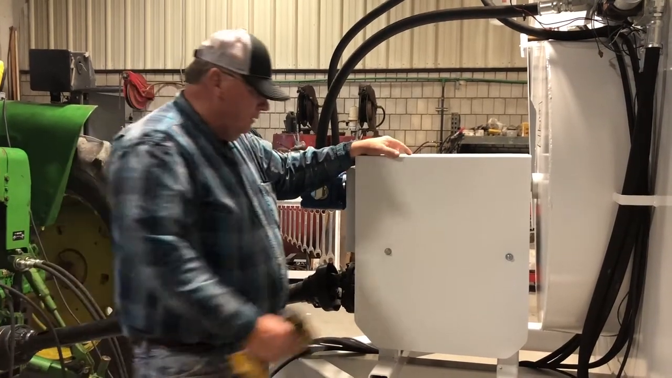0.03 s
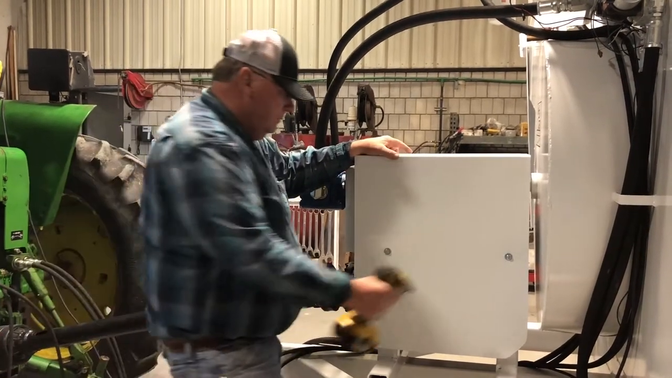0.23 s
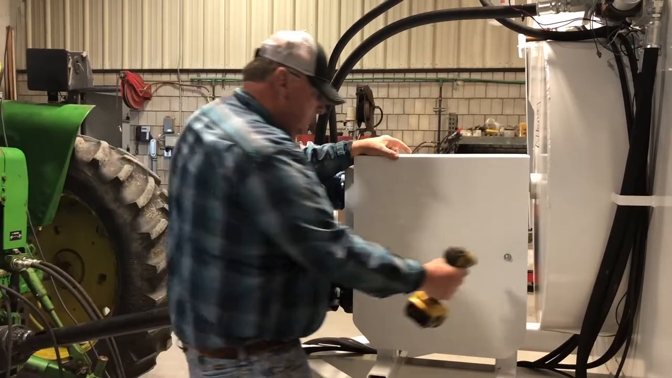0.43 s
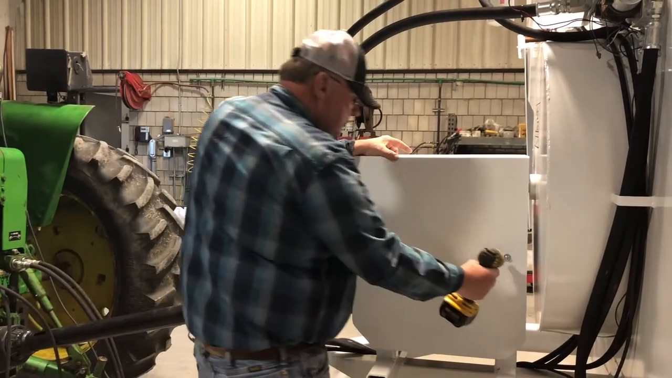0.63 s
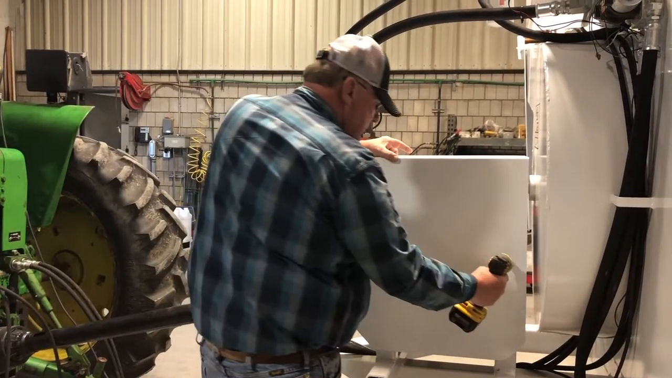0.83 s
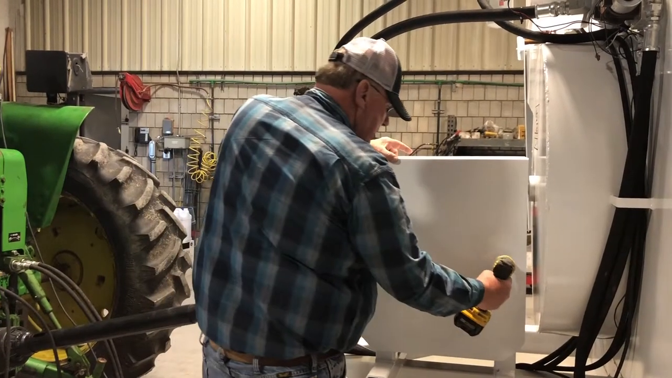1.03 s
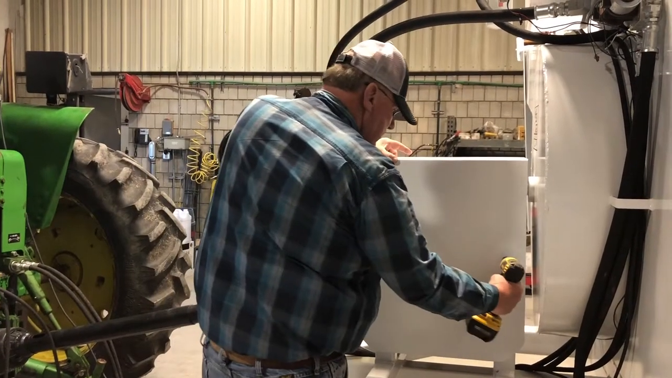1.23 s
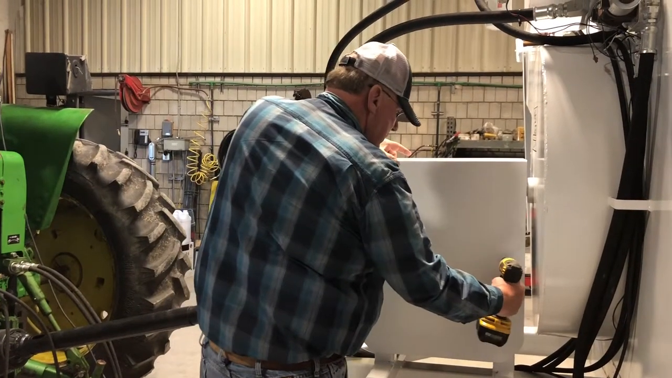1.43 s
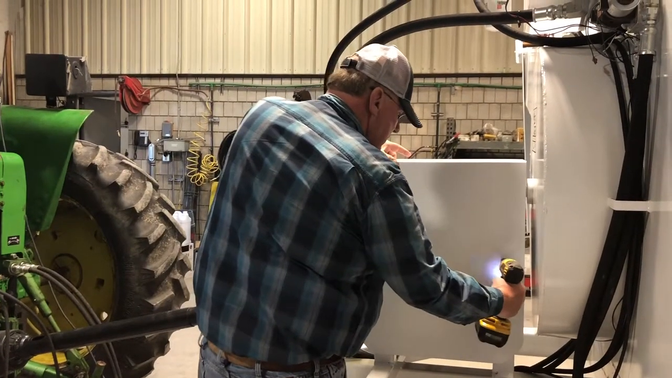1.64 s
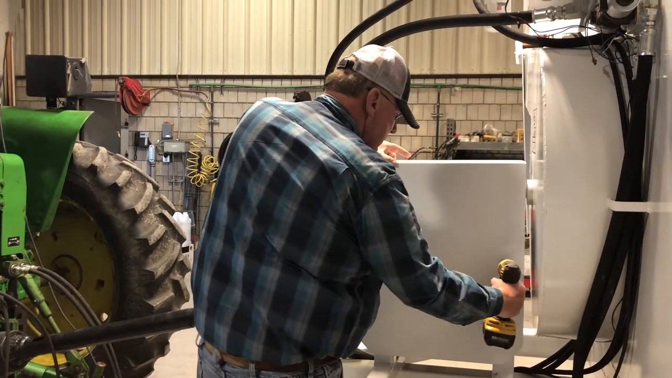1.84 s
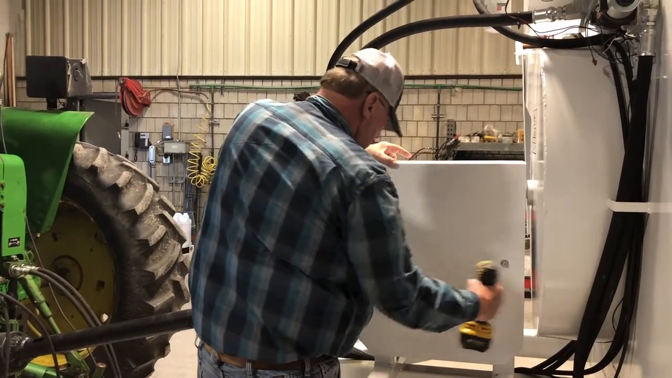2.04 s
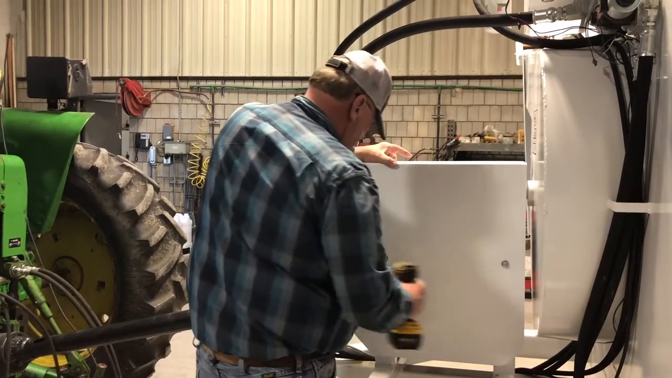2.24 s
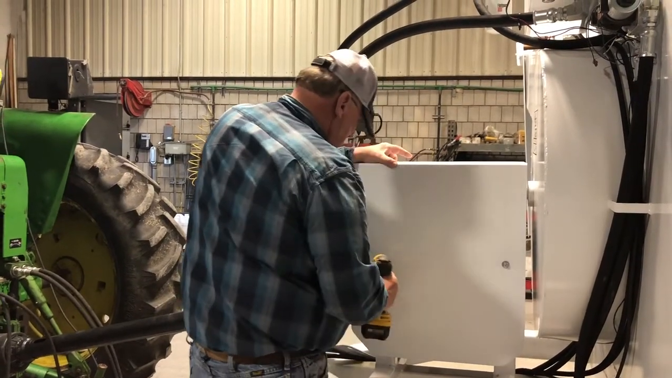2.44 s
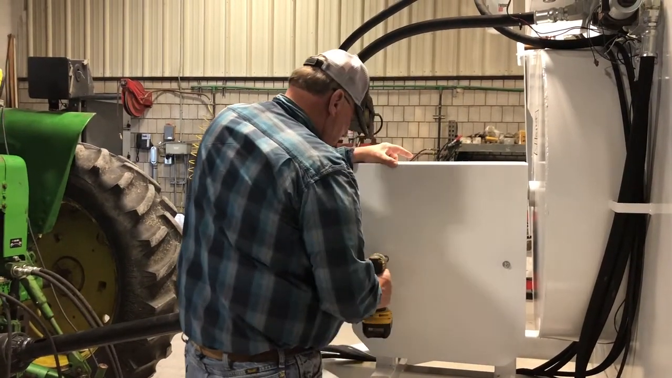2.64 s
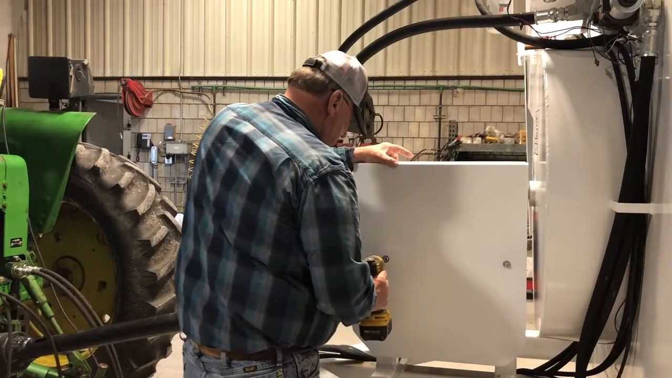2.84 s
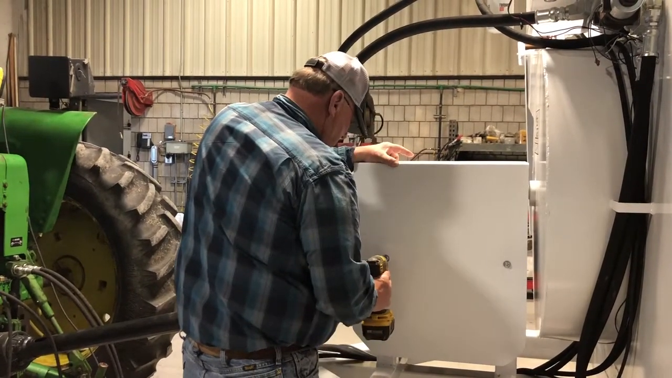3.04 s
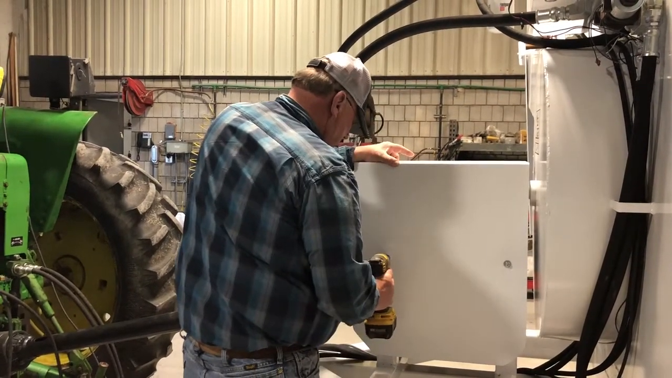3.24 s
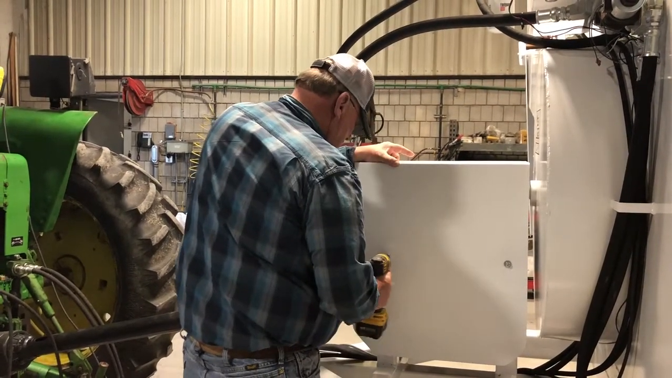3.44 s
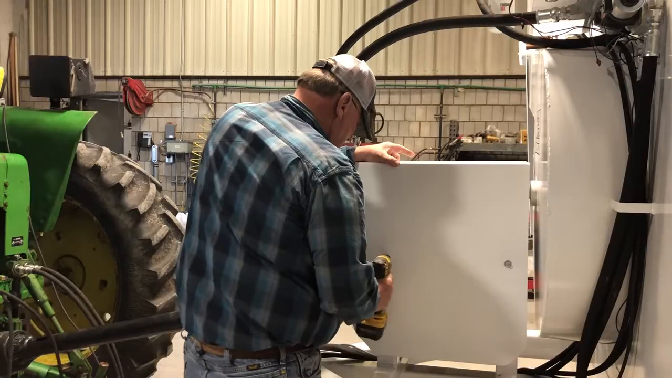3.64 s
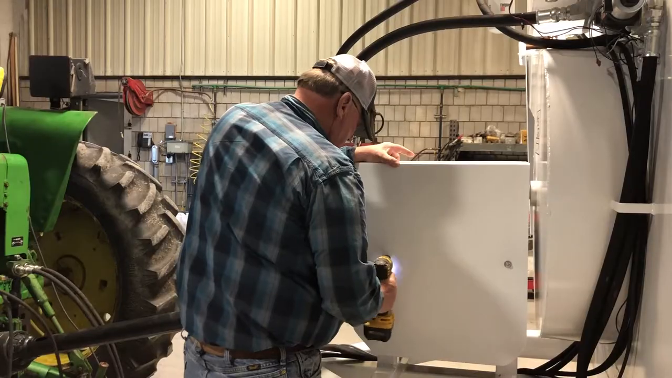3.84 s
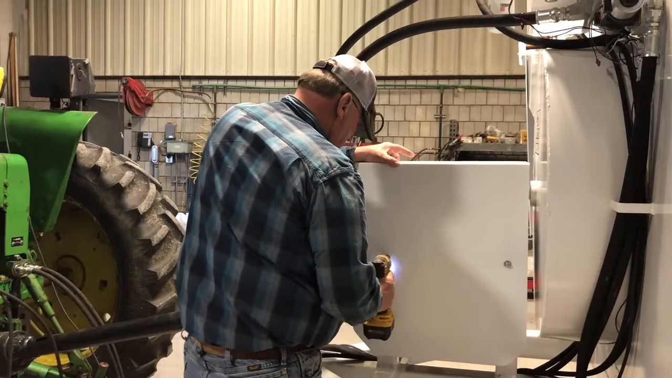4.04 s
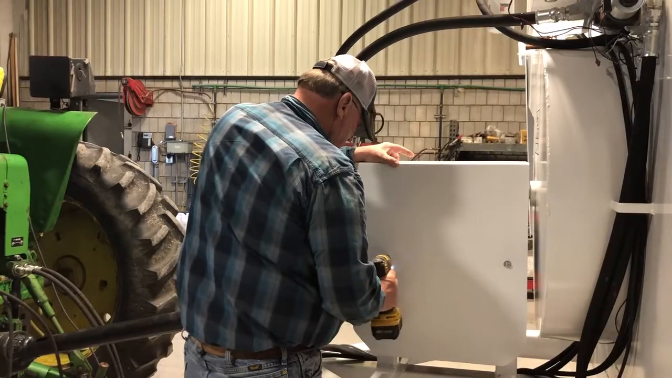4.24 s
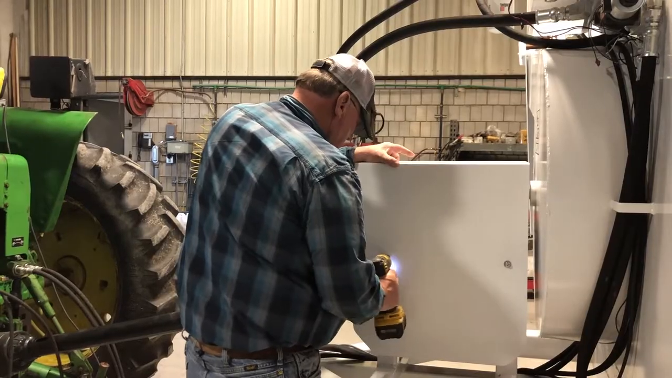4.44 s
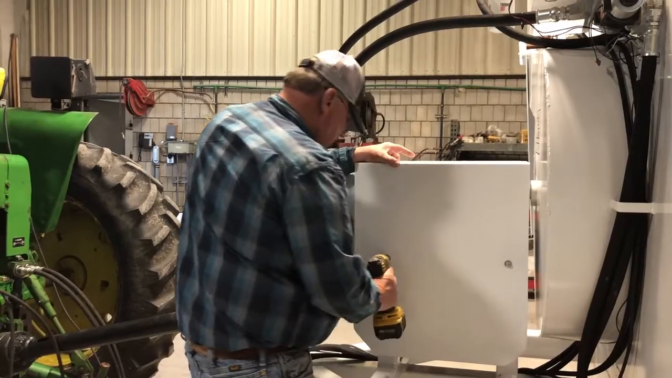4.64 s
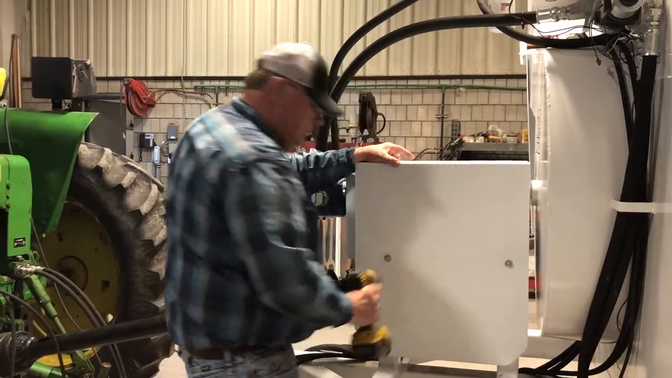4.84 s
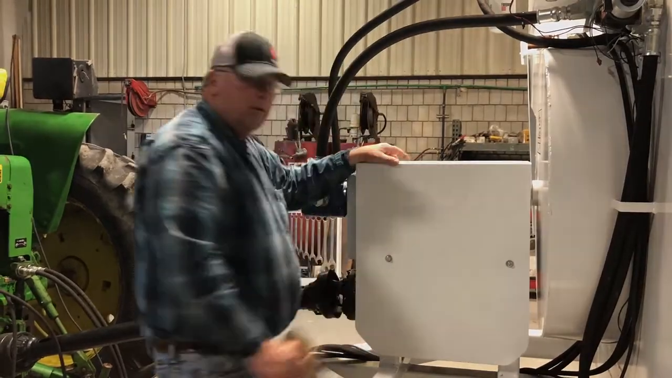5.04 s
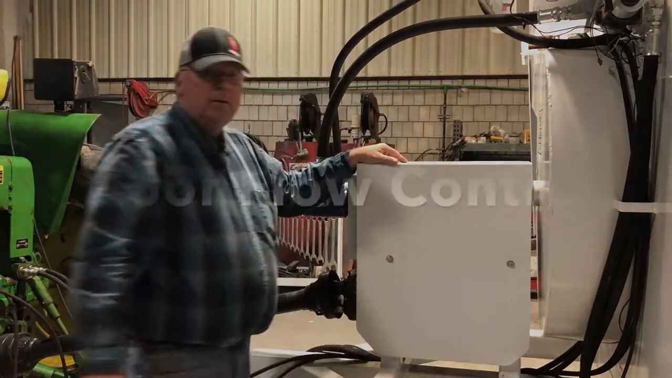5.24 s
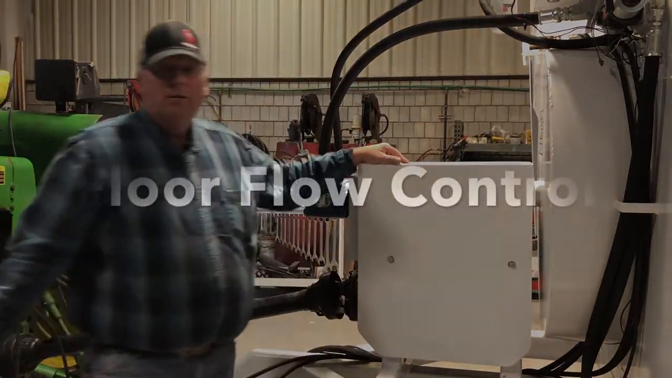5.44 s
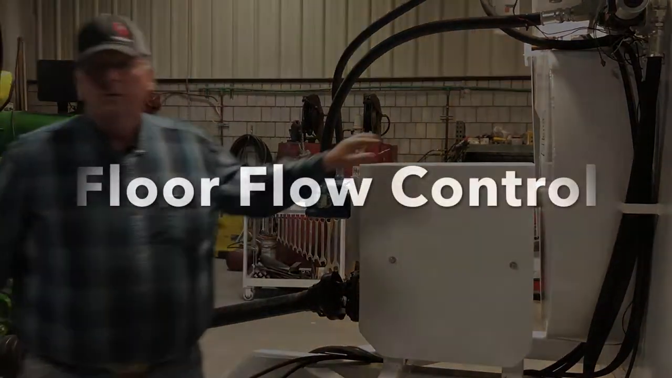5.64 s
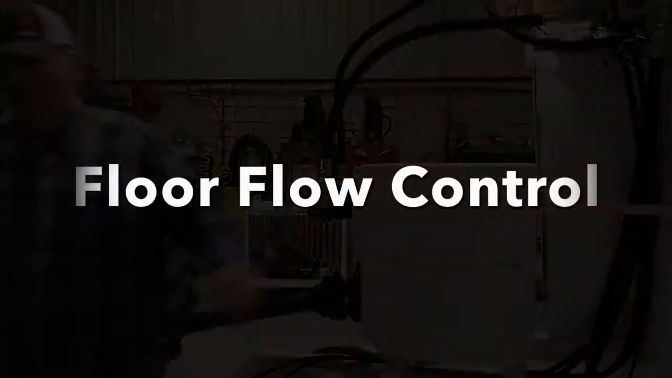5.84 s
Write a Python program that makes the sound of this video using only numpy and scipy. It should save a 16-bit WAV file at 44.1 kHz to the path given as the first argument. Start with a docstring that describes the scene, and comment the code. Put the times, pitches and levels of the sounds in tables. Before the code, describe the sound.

A big, reverberant workshop with very faint ventilation and low mains hum, heard through one mono microphone. At 0 s two soft, dull knocks touch a sheet-metal panel. Around 0.35 s a sleeve hisses lightly and a boot lands dully. At 0.9 and 1.1 s steel clinks, with hollow panel knocks and a tiny high squeak; at 1.4 s a deeper panel boom. At 1.7 s a click, then an impact driver spins up and hammers for about 0.2 s, roughly 43 blows a second, harsh, bright and overloaded, rising in pitch. The panel booms and the motor coasts down by 2.1 s into echo. A faint clink comes at 2.7 s, then taps at 3.15 and 3.5 s with a squeak. At 4.1 s the motor whirs again, with a brief stutter of blows at 4.2 s, then hammering from 4.4 to 4.65 s. The echo decays, fading to silence by about 6 s.

```python
"""Impact driver in a workshop

A cordless impact driver tightens two screws in a sheet-metal shield, in a large, echoing workshop.
Cloth hisses, a boot lands, steel clinks and the panel booms: shaped noise, some of it through resonances.
The motor spins up with gear rattle and whine; then the hammer rattles as blows of noise ring in the steel.
The bursts overload a mono microphone with a limiter, and the sound fades out at the end."""
import sys
import numpy as np
from scipy import signal
from scipy.fft import rfft, irfft
from scipy.io import wavfile
from scipy.ndimage import minimum_filter1d

SR = 44100
rng = np.random.default_rng(int(sys.argv[2]) if len(sys.argv) > 2 else 0)


def transcribe(u):
    """Save the signal u as a 16-bit wav file named by the first command-line argument.

    u: samples, shape (n,) or (channels, n), limited to [-1, 1]; the rate is SR.
    q: integer samples, one column per channel.
    """
    v = np.clip(np.atleast_2d(u).T, -1, 1)
    q = np.round(v * 32767).astype(np.int16)
    wavfile.write(sys.argv[1], SR, q)


N = 260298
TIME = np.arange(N) / SR   # seconds


def from_db(db):
    """Turn decibels into a gain."""
    return 10 ** (np.asarray(db) / 20)


def rms_one(x):
    """Scale a signal to unit power."""
    return x / np.sqrt(np.mean(x ** 2) + 1e-20)


def at_hz(points, hz):
    """Read a table between its points, along a log-frequency axis."""
    known_hz, values = np.transpose(points)
    return np.interp(np.log(np.maximum(hz, 1)), np.log(known_hz), values)


def noise(colour):
    """Make steady noise of a given colour, with unit power."""
    hz = np.fft.rfftfreq(N, 1 / SR)
    spectrum = rfft(rng.standard_normal(N)) * from_db(at_hz(colour, hz))
    return rms_one(irfft(spectrum, N))


def decay(x, seconds):
    """Turn every click into a falling exponential of the same height."""
    return signal.lfilter([1], [1, -np.exp(-1 / (seconds * SR))], x + 1e-18)


def resonance(x, hz, width_hz):
    """Ring at one pitch: a two-pole resonance with unit gain on top."""
    r = np.exp(-np.pi * width_hz / SR)
    poles = [1, -2 * r * np.cos(2 * np.pi * hz / SR), r * r]
    return signal.lfilter(np.array([1, 0, -1]) * (1 - r * r) / 2, poles, x + 1e-18)


def contacts(rows, size=16384):
    """Each touch is a gritty push, a band of noise around one pitch, that swells and lets go."""
    force = np.zeros(N + size)
    t = TIME[:size] - size / 2 / SR   # zero at the moment of touch
    hz = np.fft.rfftfreq(size, 1 / SR) + 1
    for start, level_db, centre_hz, octaves, rise_s, release_s in rows:
        band = 1 / (1 + (np.log2(hz / centre_hz) / (2 * octaves)) ** 2) ** 3
        grit = irfft(rfft(rng.standard_normal(size)) * band)
        swell = np.exp(-np.maximum(-t / rise_s, t / release_s))
        at = max(round(start * SR), 0)
        force[at:at + size] += from_db(level_db) * grit * swell
    return force[size // 2:][:N]


# Runs of hammer blows. Each row: first blow in seconds, length in seconds, blows per second,
# level of the first and of the last blow in dB, screw pitch at the first and at the last blow in Hz.
HAMMER_RUNS = [(1.725, 0.19, 43.4, 10.5, 12, 4800, 7710), (4.139, .01, 40, -9, -6, 6800, 7000),
               (4.207, .035, 53, 12, 6.5, 8600, 7300), (4.404, 0.25, 43.4, 5.5, 10.5, 4808, 8460)]
# Colour of the crack of a blow. Each row: frequency in Hz, level in dB per Hz.
CRACK_COLOUR = [(60, -40.5), (140, -33), (300, -20.5), (600, -23), (950, -10.5), (1900, -10), (2800, -7),
                (4500, 2.5), (6500, 3), (8500, 2.5), (12000, -0.5), (16000, -8)]
# Ringing of anvil, bit and screw. Each row: frequency in Hz, level in dB (only the differences count).
STEEL_RINGS = [(2735, -25), (3828, -30.5), (4500, -35.5), (4947, -35), (5276, -23.5), (6051, -35.5),
               (6272, -16.5), (6896, -34.5), (7779, -23), (8000, -28), (8290, -32.5), (9022, -26.5),
               (9830, -28.5), (9943, -27), (10207, -40), (10880, -36), (11149, -32.5), (11703, -47)]


def hammer(jitter_s, uneven_db, crack_s, cam_s, cam_db, ring_db, ring_width_hz,
           creak_db, creak_octaves, scatter_octaves):
    """The hammer grinds along its cam and hits the anvil; each blow jerks the screw round with a creak."""
    blows, creaks = np.zeros(N), []
    for start, length_s, per_s, first_db, last_db, first_hz, last_hz in HAMMER_RUNS:
        times = start + np.arange(0, length_s, 1 / per_s)
        count = len(times)
        late, strong, sharp = rng.standard_normal(size=(32, 3))[:count].T
        times = times + jitter_s * late
        levels = np.linspace(first_db, last_db, count) + uneven_db * strong
        blows[np.round(times * SR).astype(int)] = from_db(levels)
        progress = np.sqrt(np.linspace(0, 1, count))   # the creak's pitch glides fastest at first
        pitches = (first_hz + (last_hz - first_hz) * progress) * 2 ** (scatter_octaves * sharp)
        for at, level, hz in zip(times, levels, pitches):
            creaks.append((at, level + creak_db, hz, creak_octaves, cam_s / 2, crack_s))
    grind = from_db(cam_db) * decay(blows[::-1], cam_s)[::-1]   # run backwards: swells towards each blow
    crack = (decay(blows, crack_s) + grind) * noise(CRACK_COLOUR)
    loudest_db = max(db for hz, db in STEEL_RINGS)
    ring = sum(from_db(db - loudest_db) * resonance(crack, hz, ring_width_hz) for hz, db in STEEL_RINGS)
    return crack + from_db(ring_db) * ring + contacts(creaks)


# Colour of the gear rattle. Each row: frequency in Hz, level in dB per Hz.
GEAR_COLOUR = [(60, -40), (150, -4.5), (400, -4), (700, -3), (1100, -1), (2000, -3.5), (2900, 3),
               (4700, -6), (6200, 0), (8500, 2.5), (11000, -9.5), (16000, -16)]


def motor(rotor_hz, mesh_hz, whine_db, throb, wobble, panel_db):
    """Gear rattle throbs once a turn; the teeth whine at a pitch that follows the speed."""
    speed, level = trigger()
    unsteady = 1 + wobble * rms_one(decay(rng.standard_normal(N), 0.0024))
    travel = 2 * np.pi * np.cumsum(speed * unsteady) / SR
    rattle = noise(GEAR_COLOUR) * (1 + throb * np.sin(rotor_hz * travel))
    whine = np.sin(mesh_hz * travel) + .5 * np.sin(2 * mesh_hz * travel)
    drive = level * (rattle + from_db(whine_db) * whine)
    return .5 * drive + from_db(panel_db) * shield(drive)   # the panel sounds along


# LOAD_SAG is the share of speed lost under full load; LEVEL_FOLLOWS_SPEED is a power.
SPIN_UP_S, COAST_S, LOAD_LAG_S = .013, .13, .07
LOAD_SAG, LOAD_DB, LEVEL_FOLLOWS_SPEED = .17, -10.5, 2.3
# Trigger pulls, one per screw. Each row: start in seconds, time held in seconds,
# free-running level in dB, pitch at which the panel booms there in Hz.
PULLS = [(1.68, .26, -15, 350), (4.088, 0.63, -23, 176)]


def trigger():
    """Motor speed and loudness follow the trigger; hammering slows it and makes the gears louder."""
    hammering = sum(1.0 * (TIME > start) * (TIME < start + length_s)
                    for start, length_s, *_ in HAMMER_RUNS)
    load = decay(hammering, LOAD_LAG_S) / (LOAD_LAG_S * SR)
    speed, level = np.zeros(N), np.zeros(N)
    for pressed, held_s, free_db, _ in PULLS:
        t = np.maximum(TIME - pressed, 0)
        coasting = np.exp(-np.maximum(t - held_s, 0) / COAST_S)
        spin = (1 - np.exp(-t / SPIN_UP_S)) * coasting
        speed += spin * (1 - LOAD_SAG * load)
        level += spin ** LEVEL_FOLLOWS_SPEED * (from_db(free_db) + from_db(LOAD_DB) * load)
    return speed, level


# Resonances of the driver's housing. Each row: frequency in Hz, width in Hz, level in dB.
HOUSING_MODES = [(230, 90, -6.5), (418, 70, -1.5), (2800, 110, -9.5)]


def housing(x):
    """The driver's body resonates and adds its own hollow colour."""
    return x + sum(from_db(db) * resonance(x, hz, width) for hz, width, db in HOUSING_MODES)


RISE_SHARE = 0.63   # a touch swells in this share of the time that it takes to let go
# Bit and screw touching the shield.
# Each row: time in seconds, level in dB, brightest frequency in Hz, time to let go in seconds.
CLINK_TOUCHES = [(.892, -2.5, 3000, .010), (1.068, 2, 5000, 0.008), (1.098, 0.5, 3300, 0.0052),
                 (1.408, -18.5, 4000, 0.011), (1.685, 4.5, 3560, 0.0033), (2.729, -9.5, 6800, .007),
                 (3.151, -1, 3100, 0.0015), (3.174, -6.5, 2700, 0.0081), (3.481, -1.5, 3450, 0.0085),
                 (5.605, -31, 7210, .01)]


def clinks(octaves):
    """Steel touches steel with broad, bright bursts of noise."""
    return contacts([(start, db, hz, octaves, RISE_SHARE * release_s, release_s)
                     for start, db, hz, release_s in CLINK_TOUCHES])


# The bit squeaking in the screw head.
# Each row: time in seconds, level in dB, pitch in Hz, time to let go in seconds.
SQUEAK_TOUCHES = [(1.070, 1, 10510, .01), (3.487, 0.5, 5960, 0.012)]


def squeaks(octaves):
    """The bit rubs in the screw head: a band of noise narrow enough to have a pitch."""
    return contacts([(start, db, hz, octaves, RISE_SHARE * release_s, release_s)
                     for start, db, hz, release_s in SQUEAK_TOUCHES])


THUD_LAG_S, THUD_HZ = .045, 331
KNOCK_OCTAVES, THUD_OCTAVES, KNOCK_CYCLES = .45, .7, 5.8   # the deeper the knock, the longer it lasts
SEAT_DB, SEAT_LAG_S = 10.5, 0.011   # boom of the panel after each hammer run, against the last blow
# Dull knocks on the panel, which flexes back with a deeper thud.
# Each row: time in seconds, knock level in dB, knock pitch in Hz, thud level in dB.
PANEL_KNOCKS = [(.001, 2, 587, -13.5), (0.028, -3.5, 594, -17), (.897, 7.5, 710, 6), (1.099, 4, 745, -8),
                (1.408, 10.5, 641, 12.5), (3.185, -4, 870, -9), (3.49, -3.5, 859.3, -4.5)]


def knocks():
    """Soft pushes on the panel: each knock, the thud after it, and a boom whenever the hammer stops."""
    pushes = []
    for start, knock_db, hz, thud_db in PANEL_KNOCKS:
        pushes.append((start, knock_db, hz, KNOCK_OCTAVES))
        pushes.append((start + THUD_LAG_S, thud_db, THUD_HZ, THUD_OCTAVES))
    for start, length_s, _, _, last_db, _, _ in HAMMER_RUNS:
        boom_hz = [hz for pressed, _, _, hz in PULLS if pressed < start][-1]   # from the latest pull
        pushes.append((start + length_s + SEAT_LAG_S, last_db + SEAT_DB, boom_hz, THUD_OCTAVES))
    return contacts([(start, db, hz, octaves, RISE_SHARE * KNOCK_CYCLES / hz, KNOCK_CYCLES / hz)
                     for start, db, hz, octaves in pushes])


# Resonances of the sheet-metal shield. Each row: frequency in Hz, width in Hz, level in dB.
SHIELD_MODES = [(172, 21, -8.5), (316, 21, -4), (422, 40, -3.5), (573, 150, -7.5), (759, 44, -10),
                (884, 60, 2.5), (1540, 44, -7.5), (1860, 870, -5), (2710, 750, -7.5), (3310, 220, -4),
                (3570, 88, -1.5), (3890, 770, -4.5), (5463, 1400, -4), (6150, 130, -12), (7500, 490, -11.5),
                (10700, 4200, -17.5)]


def shield(force):
    """The panel rings in all its resonances at once, with notches between them."""
    return sum(from_db(db) * resonance(force, hz, width) for hz, width, db in SHIELD_MODES)


# The sleeve slides as the arm swings up.
SLEEVE_START_S, SLEEVE_DB = 0.33, -27.5
SLEEVE_ATTACK_S, SLEEVE_HOLD_S, SLEEVE_RELEASE_S = .05, .04, 0.036
# Colour of sliding cloth. Each row: frequency in Hz, level in dB per Hz.
CLOTH_COLOUR = [(200, -24), (1000, -18.5), (1900, -9.5), (3800, 2), (5500, 0), (8000, -4), (11000, -10.5),
                (16000, -21)]


def sleeve(grain_db):
    """Cloth slides on cloth with a fine, uneven hiss."""
    corners = SLEEVE_START_S + np.cumsum([0, SLEEVE_ATTACK_S, SLEEVE_HOLD_S, SLEEVE_RELEASE_S])
    stroke = np.interp(TIME, corners, [0, 1, 1, 0])
    grain = grain_db * rms_one(decay(rng.standard_normal(N), .002))
    return from_db(SLEEVE_DB + grain) * stroke * noise(CLOTH_COLOUR)


# A boot set down as the worker steps in. Each row: time in seconds, level in dB,
# brightest frequency in Hz, width in octaves, rise in seconds, release in seconds.
BOOT_STEPS = [(.425, -14, 192, 0.76, .002, 0.0074)]


def footfall():
    """The boot presses on the floor with a short, dull burst of noise."""
    return contacts(BOOT_STEPS)


# Colour of the air in the workshop. Each row: frequency in Hz, level in dB per Hz.
AIR_COLOUR = [(25, -42), (55, -15.5), (90, -7), (140, 7.5), (200, 5), (400, -2), (700, -6.5), (1500, -11),
              (3000, -19), (6000, -26.5), (10000, -38), (16000, -49)]


def shop_floor(air_db, hum_db):
    """Faint ventilation, as steady noise, and mains hum, as a pure tone."""
    hum = np.sin(2 * np.pi * 120 * TIME)
    return from_db(air_db) * noise(AIR_COLOUR) + from_db(hum_db) * hum


# Echo of the walls, before the air takes the treble.
# Each row: frequency in Hz, time to fall by 60 dB in seconds.
WALL_ECHO = [(60, 0.28), (150, 1.1), (400, 1.04), (900, 1.108), (2500, 1.186), (6000, 1.015)]


def workshop(build_s, near_db, near_s, air_hz):
    """Diffuse echo of the hall: nearby surfaces answer first; air absorbs with the square of frequency."""
    t = TIME[:2 * SR]
    hz, frames_s, cells = signal.stft(rng.standard_normal(len(t)), SR, nperseg=256)
    falls_per_s = 1 / at_hz(WALL_ECHO, hz) + (hz / air_hz) ** 2   # falls of 60 dB per second
    fading = np.exp(-np.log(1000) * np.outer(falls_per_s, frames_s))
    tail = signal.istft(cells * fading, SR)[1][:len(t)]
    near = 1 + from_db(near_db) * np.exp(-t / near_s)
    tail = tail * (1 - np.exp(-t / build_s)) * near
    return tail / np.linalg.norm(tail)


def heard(x, hall, direct_db, echo_db):
    """Add the hall's answer to the direct sound."""
    return from_db(direct_db) * x + from_db(echo_db) * signal.fftconvolve(x, hall)[:N]


TOOL_DIRECT_DB, TOOL_ECHO_DB, SWAY_HZ = -2, -2, 1.7


def scene():
    """The worker's body screens the tool, so much of its sound arrives by way of the hall."""
    blows = hammer(jitter_s=.0004, uneven_db=2.0, crack_s=0.0038, cam_s=0.0064, cam_db=-6.5,
                   ring_db=1.5, ring_width_hz=39, creak_db=3.5, creak_octaves=0.29, scatter_octaves=0.22)
    running = motor(rotor_hz=405, mesh_hz=3052, whine_db=-9.5, throb=0.07, wobble=.025, panel_db=-6)
    tool = housing(blows + running)
    panel = shield(clinks(octaves=0.8) + squeaks(octaves=.2) + knocks())
    worker = sleeve(grain_db=2.0) + footfall()
    panel_hall = workshop(build_s=0.002, near_db=1.0, near_s=0.083, air_hz=8350)
    mono = heard(panel, panel_hall, direct_db=-16, echo_db=-14.0)
    mono = mono + heard(worker, panel_hall, direct_db=-4.5, echo_db=-11.0)
    mono = mono + shop_floor(air_db=-61.5, hum_db=-71.5)
    sway = 2 * np.pi * SWAY_HZ * TIME   # radians
    for share in (np.cos(sway), np.sin(sway)):   # the tool sways in the hand, so the echo paths keep changing
        hall = workshop(build_s=0.0024, near_db=-3.5, near_s=0.056, air_hz=8050)
        mono = mono + from_db(TOOL_ECHO_DB) * signal.fftconvolve(share * tool, hall)[:N]
    mono = mono + from_db(TOOL_DIRECT_DB) * tool
    return np.array([mono, mono])


def limiter(x, threshold_db, release_db_per_s, window_s, hold_s):
    """The gain drops as soon as the level passes the threshold, waits, then creeps back, lifting the echo."""
    power = decay(np.mean(x ** 2, axis=0), window_s) / (window_s * SR)
    over = np.maximum(10 * np.log10(power + 1e-12) - threshold_db, 0)
    half = int(hold_s * SR / 2)
    over = -minimum_filter1d(-over, 2 * half + 1, origin=half)   # the highest value of the last moments
    slope = release_db_per_s * TIME
    held_db = np.maximum.accumulate(over + slope) - slope
    return x * from_db(-held_db)


def overload(x, top):
    """Peaks are flattened against the top."""
    return x / (1 + (x / top) ** 6) ** (1 / 6)


CUTOFF_HZ, FADE_S, FADE_POWER = 15750, 0.87, 1.02


def record(dry):
    """The microphone: limiter and overload, then the closing fade and a steep top cut."""
    limited = limiter(dry, threshold_db=0.0, release_db_per_s=22.5, window_s=0.0026, hold_s=0.05)
    loud = overload(limited, top=0.79)
    faded = loud * np.minimum((TIME[-1] - TIME) / FADE_S, 1) ** FADE_POWER
    return signal.sosfilt(signal.ellip(10, .1, 80, CUTOFF_HZ, fs=SR, output="sos"), faded)


dry = scene()
out = record(dry)
transcribe(out)
```